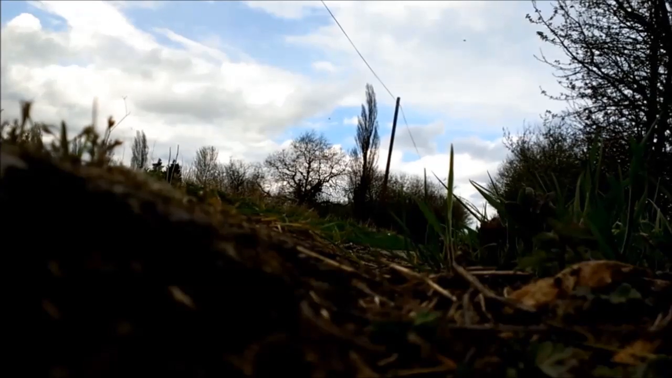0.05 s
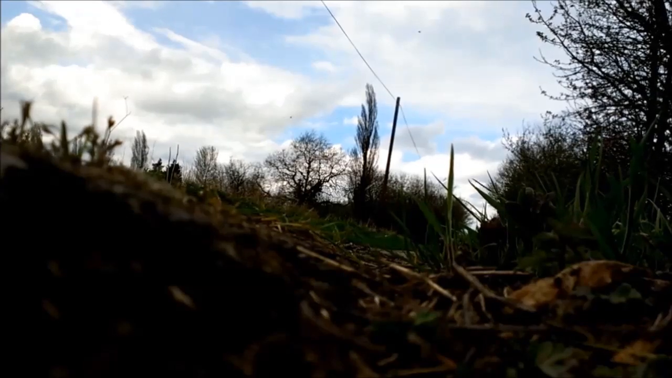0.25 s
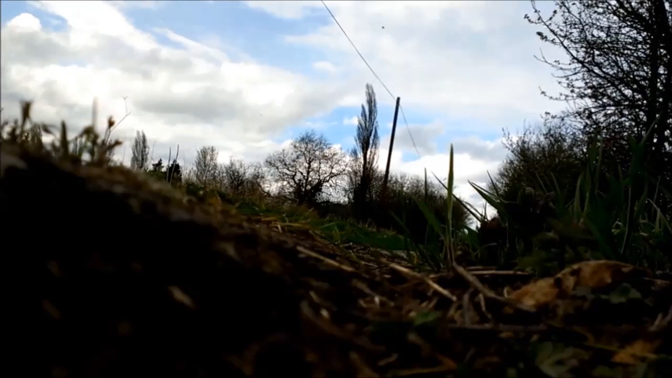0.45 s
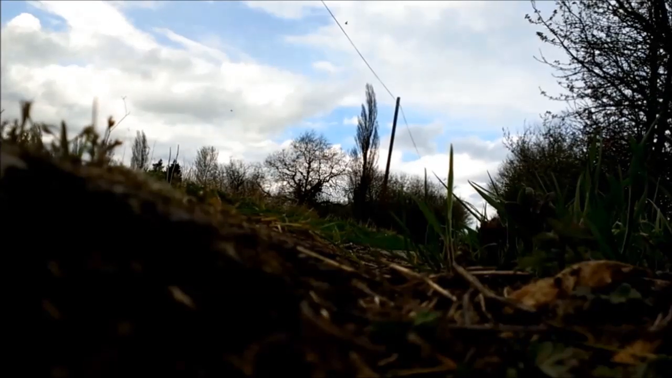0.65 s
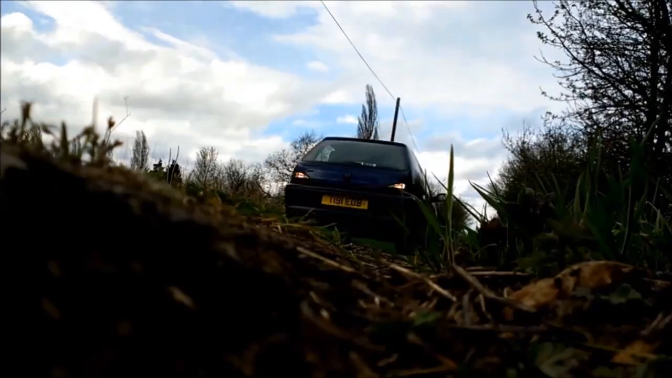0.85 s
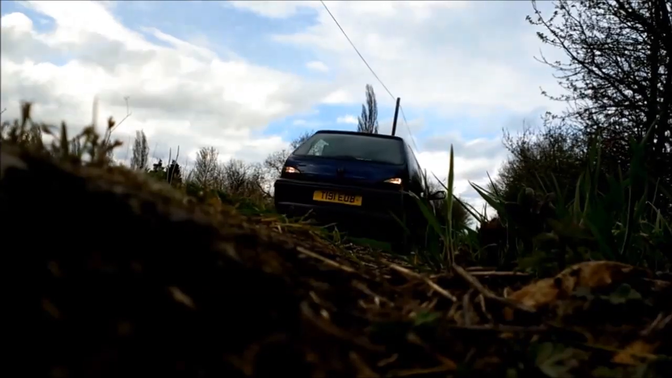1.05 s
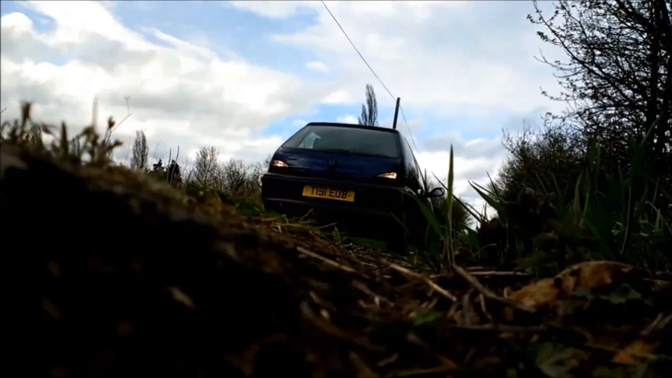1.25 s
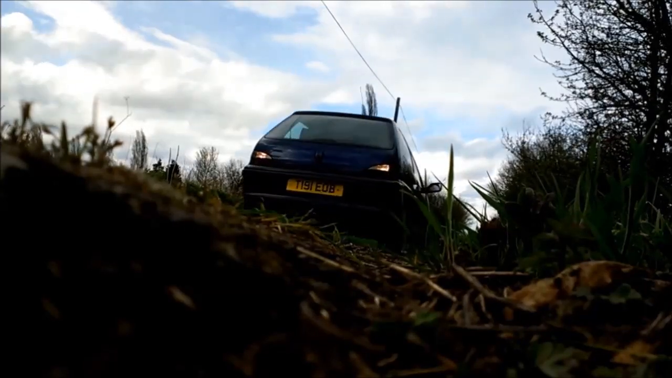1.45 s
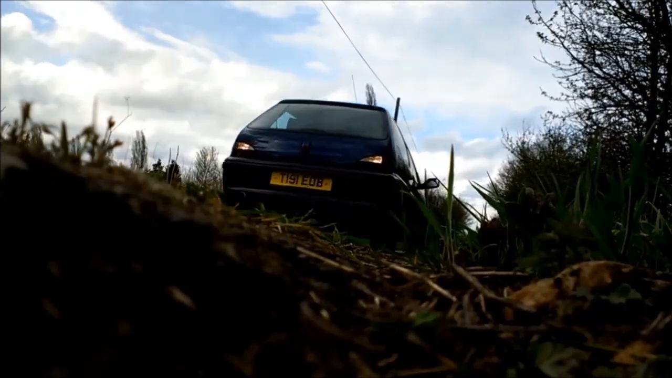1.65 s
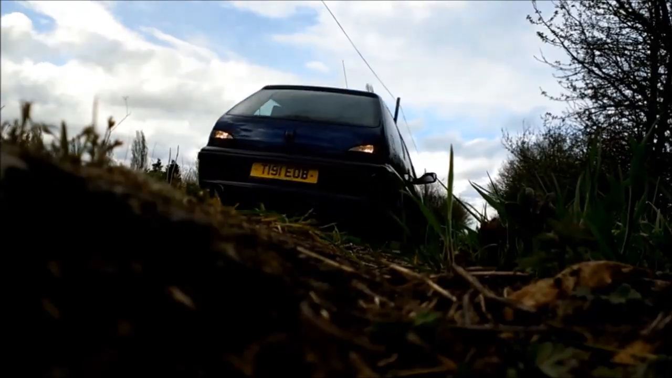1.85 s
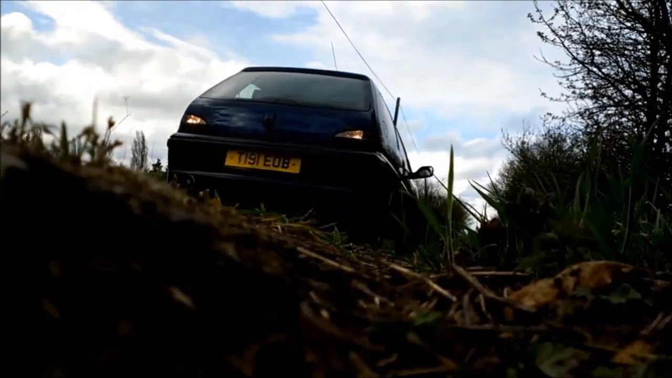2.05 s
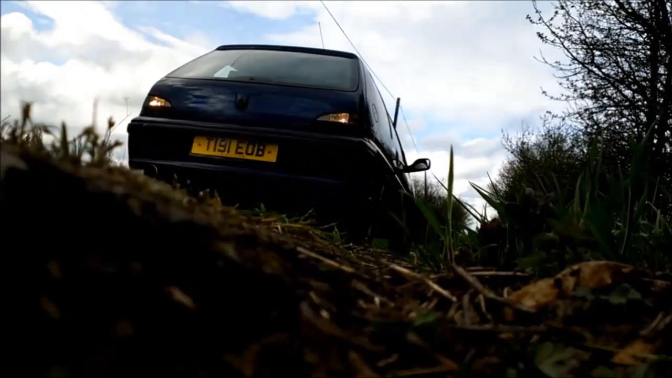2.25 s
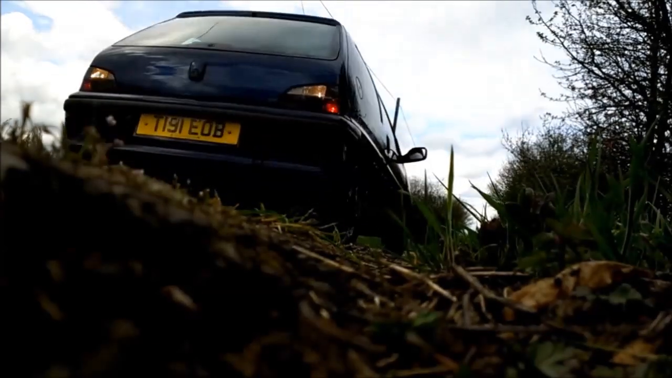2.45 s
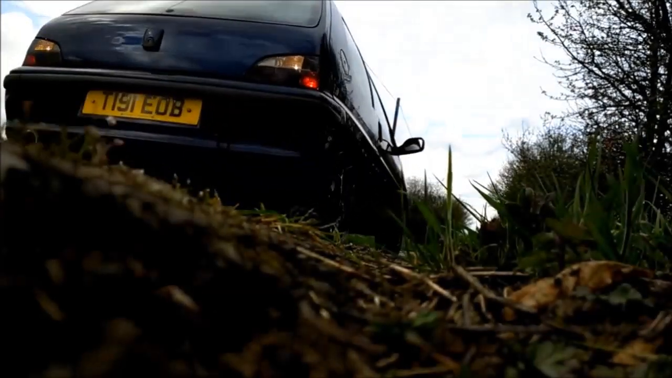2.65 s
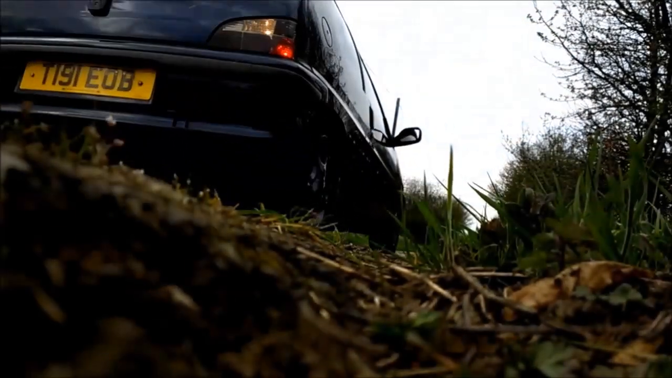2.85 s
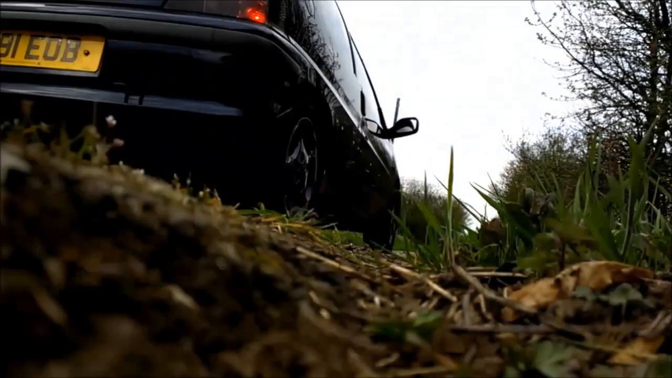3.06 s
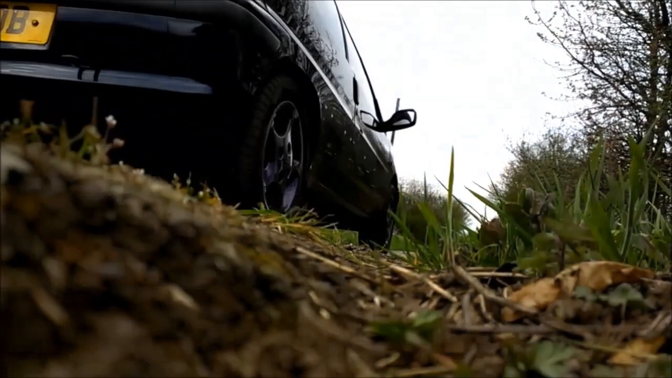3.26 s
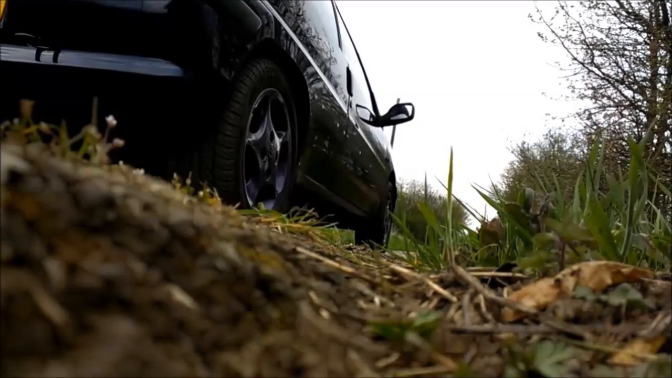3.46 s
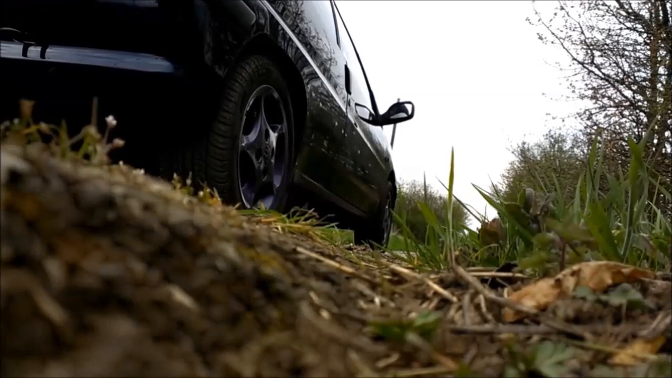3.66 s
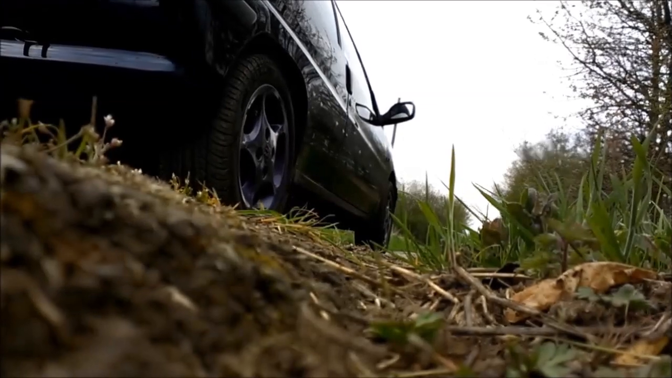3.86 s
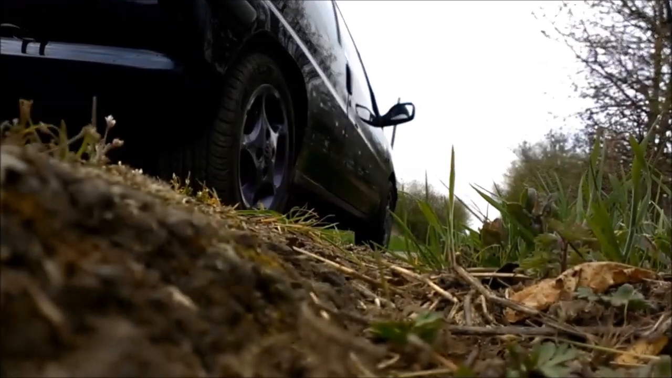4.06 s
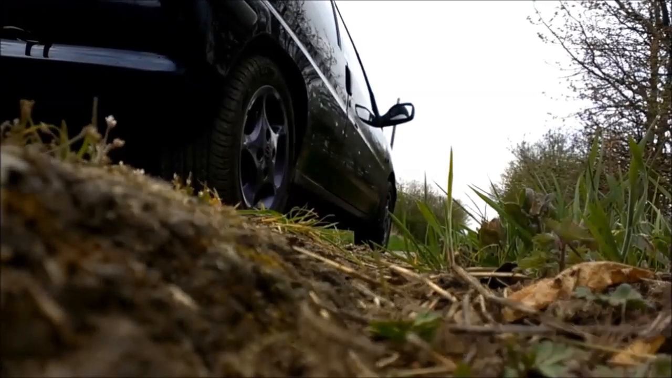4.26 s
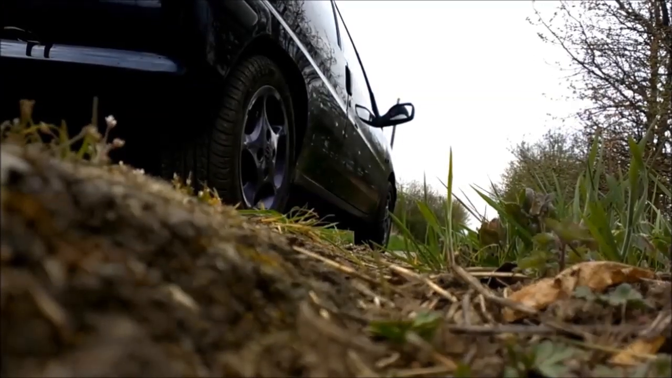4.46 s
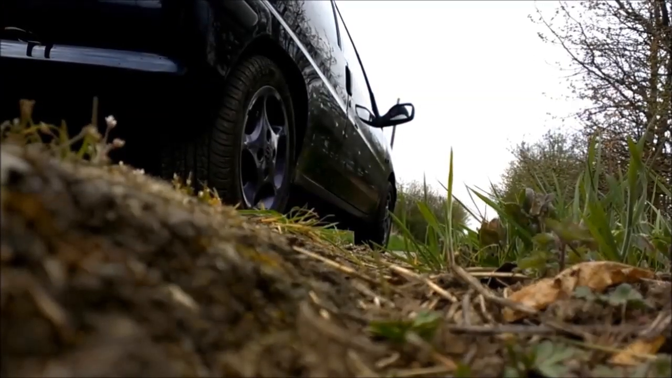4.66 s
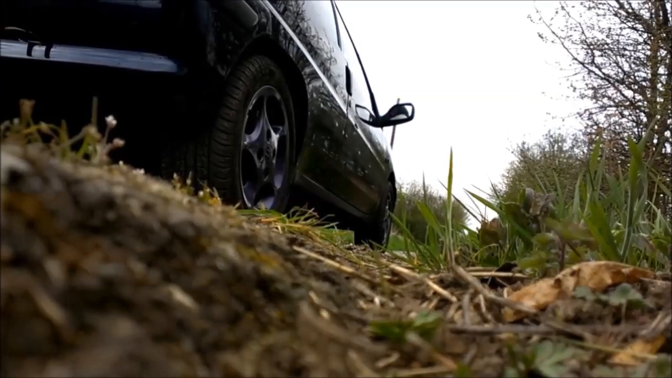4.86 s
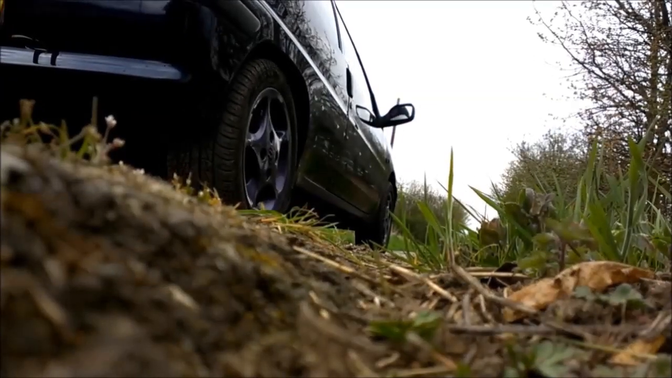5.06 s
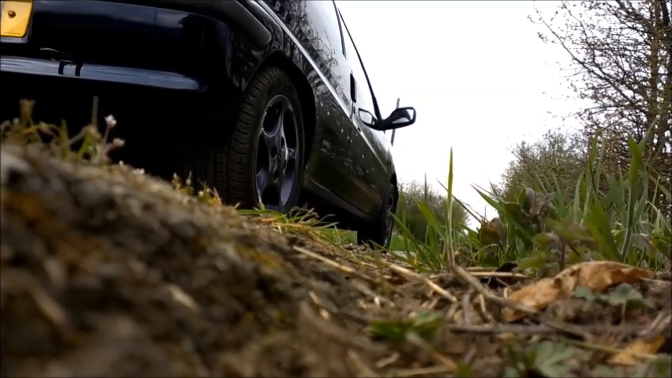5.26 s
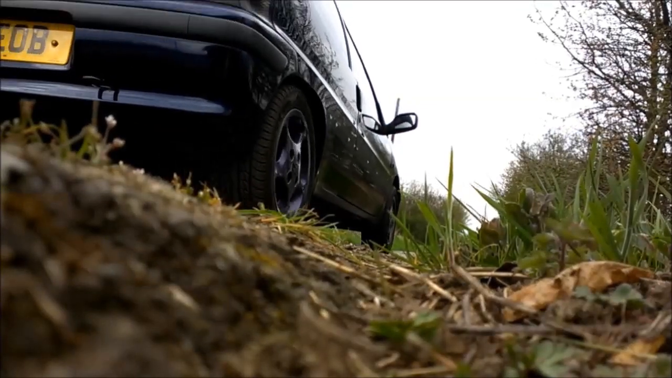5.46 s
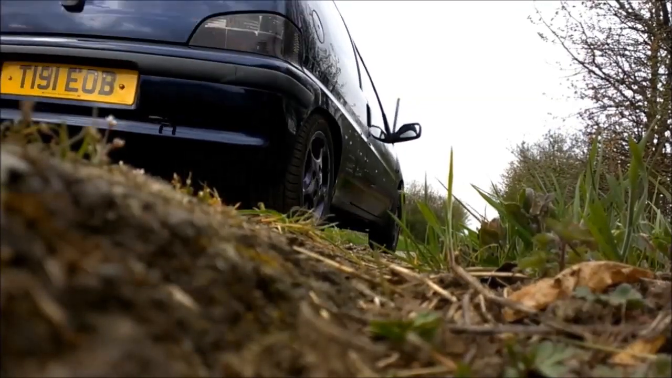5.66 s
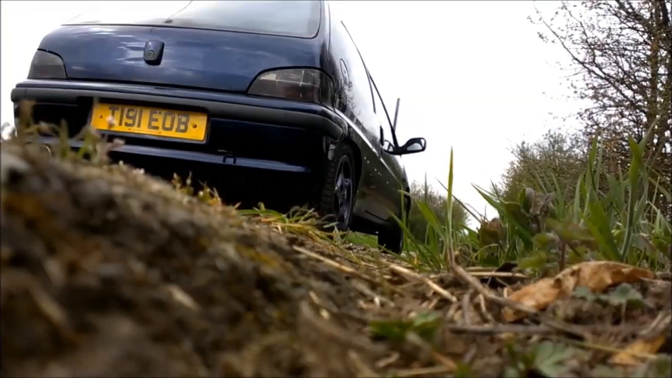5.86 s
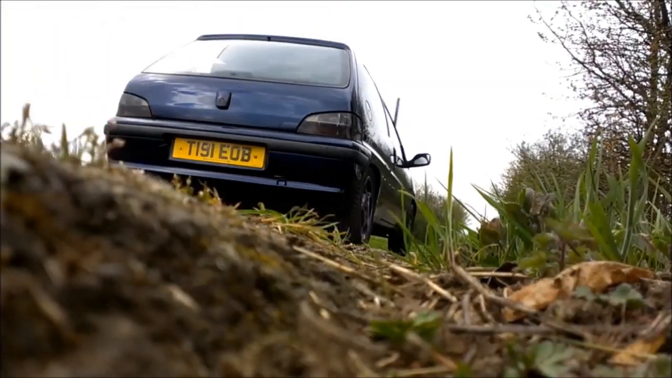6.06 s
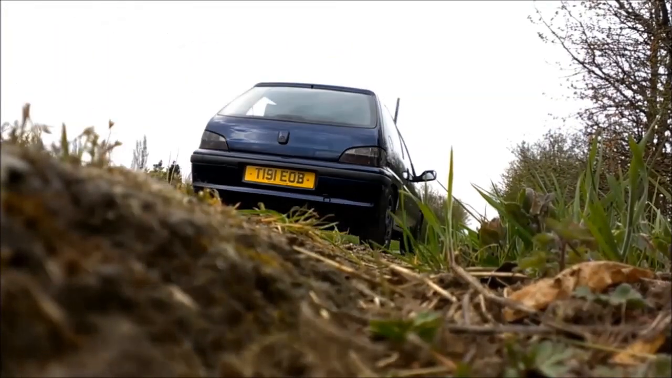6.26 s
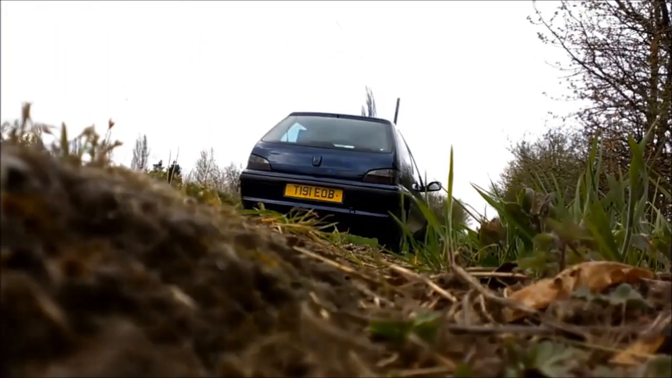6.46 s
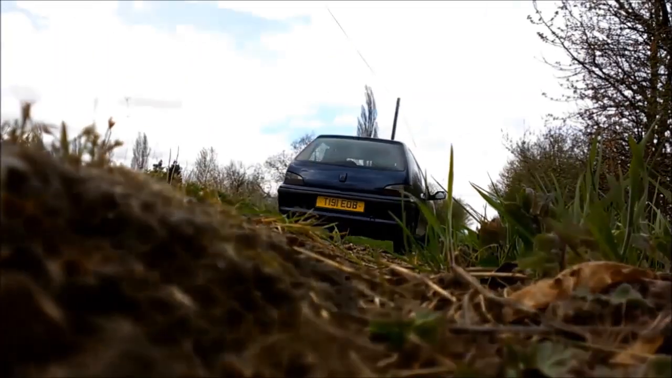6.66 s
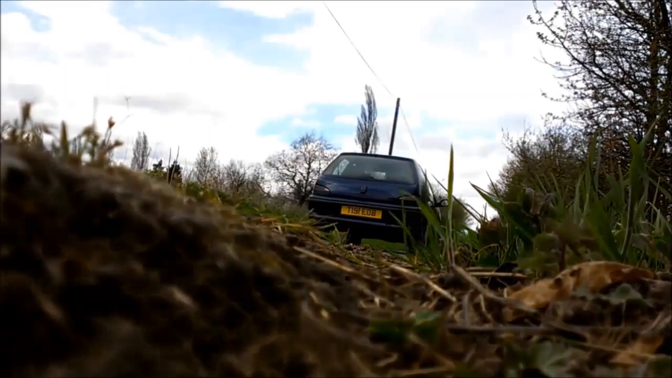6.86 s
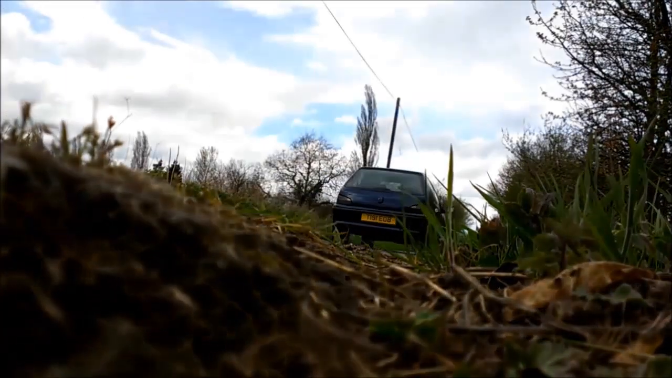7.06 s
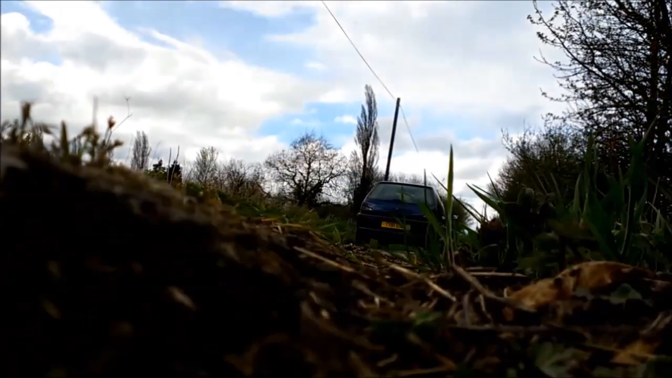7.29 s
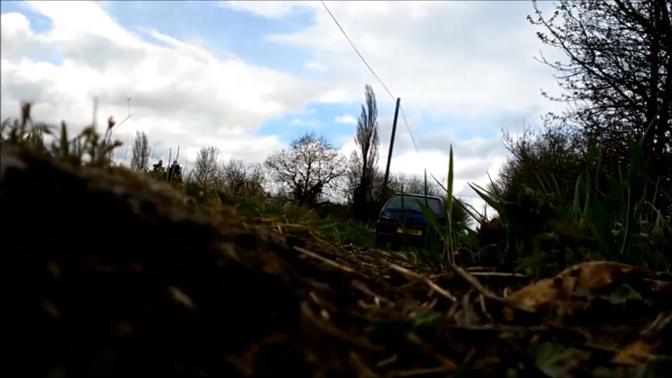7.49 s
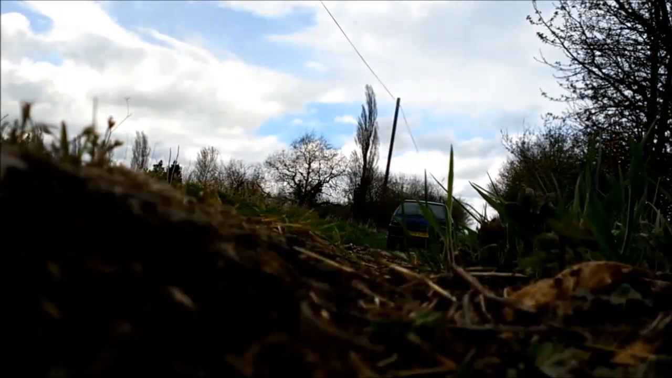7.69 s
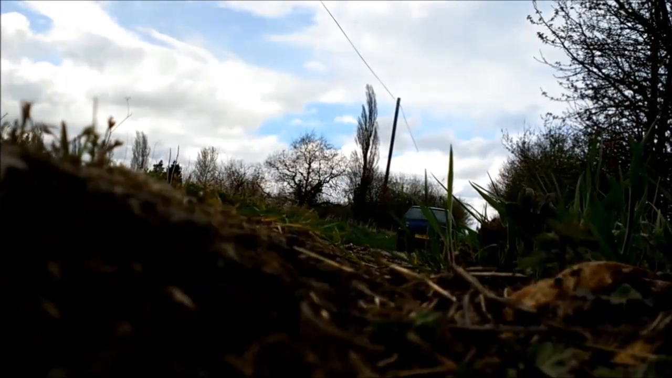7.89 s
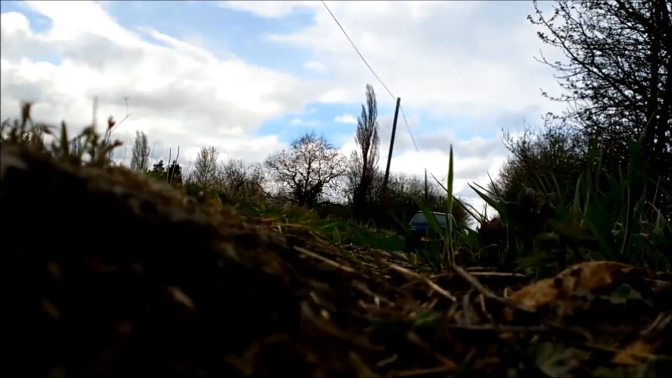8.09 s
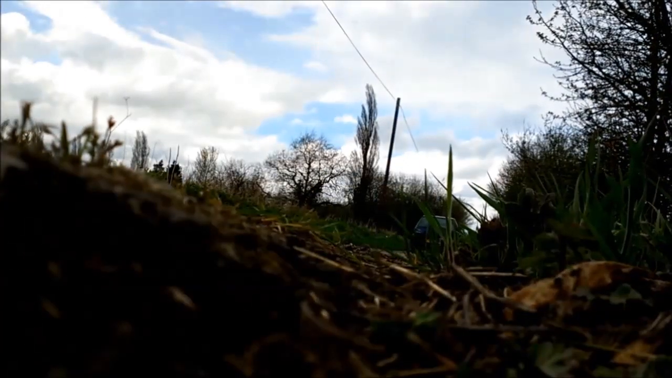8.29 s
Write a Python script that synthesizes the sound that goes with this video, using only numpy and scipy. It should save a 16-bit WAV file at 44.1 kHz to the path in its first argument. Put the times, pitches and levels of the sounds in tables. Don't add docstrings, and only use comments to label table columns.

```python
import sys
import numpy as np
from scipy import signal
from scipy.io import wavfile
from scipy.ndimage import uniform_filter1d

SR = 44100
rng = np.random.default_rng(int(sys.argv[2]) if len(sys.argv) > 2 else 0)


def master_out(mix):
    frames = np.transpose(np.atleast_2d(mix))
    ceiling = np.clip(frames, -1, 1)
    pcm = np.round(ceiling * 32767).astype(np.int16)
    wavfile.write(sys.argv[1], SR, pcm)


def field_ratio(decibels):
    return 10 ** (np.asarray(decibels, dtype=float) / 20)


N = 367353

# [f/Hz, density/dB]
FLOOR_COLOUR = [(24, -34), (40, 4), (234, 3), (277, 1), (306, -3.5), (337, -2), (1120, -14.5),
                (1470, -16.5), (2070, -23.5), (4880, -20.5), (7970, -32), (14000, -37)]
FLOOR_DB = -64
# [t/s, level/dB]
FAR_VEHICLE = [
    (0, -71),
    (.04, -62.5),
    (.075, -72),
    (.1, -93),
]
# [t/s, peak level/dB, half length/s]
GUSTS = [(.02, -64.5, 0.19), (0.694, -63.5, 0.22), (1.174, -57, 0.37), (1.575, -52, 0.23),
         (1.837, -49.5, 0.21), (2.015, -47, 0.17), (2.32, -55, 0.17), (2.78, -47, 0.18), (3.024, -51, 0.3),
         (3.155, -46.5, 0.14), (3.345, -46, 0.042), (3.596, -50, 0.52), (3.75, -41.5, 0.083),
         (4.042, -51, 0.16), (4.208, -50, 0.1), (4.48, -47, 0.22), (4.82, -73.5, 0.17),
         (5.055, -46.5, 0.28), (5.503, -64, .17), (5.817, -59, 0.081), (6.07, -49.5, 0.073),
         (6.32, -49, 0.11), (6.57, -41, 0.073), (6.802, -60, .07), (7.02, -51, 0.13), (7.63, -53.5, .12),
         (7.833, -49, 0.23)]
GUST_FALL_DB, LULL_DB = 12.5, -80
# [f/Hz, level/dB]
WIND_COLOUR = [(15, -7), (30, -4.5), (60, -0.5), (100, -4), (160, -8), (300, -23.5), (600, -55.5)]
# [t/s, peak level/dB, f/Hz]
THUMPS = [(1.801, -32.5, 584), (1.874, -27.5, 245), (1.913, -33, 119), (2.03, -29, 169), (2.09, -33.5, 108),
          (2.831, -41, 198), (3.052, -31, 101), (3.15, -27, 70), (3.347, -26.5, 66), (3.538, -33, 162),
          (3.607, -29.5, 113), (3.68, -32, 100), (3.741, -29.5, 190), (6.571, -29.5, 80)]
# [t/s, peak level/dB, decay/s]
CRACKS = [
    (0.8945, -71, 0.041),
    (3.1966, -69, 0.06),
    (3.39, -59.5, 0.13),
    (4.9077, -63, 0.074),
    (6.6917, -70, 0.055),
]

# [t/s, firing rate f/Hz]
FIRING = [(.89, 33), (1.17, 29.2), (1.42, 33.5), (1.7, 34.5), (1.9, 37.3), (2.17, 37.6), (2.6, 27.4),
          (4.45, 27.9), (4.92, 52), (5.13, 51), (5.36, 76), (5.45, 80.4), (5.55, 81.8), (5.8, 74.2),
          (6.08, 59.5), (7.52, 126.7), (7.9, 103.3), (8.33, 89)]
# [t/s, effort level/dB]
EFFORT = [(.89, -40), (2.1, -37), (2.5, -43), (2.9, -36.5), (4.45, -41.5), (4.6, -33), (5.05, -33.5),
          (5.42, 0), (5.7, -1), (6.06, -21), (6.48, -1.5), (7.15, -7.5), (7.43, -2.5), (7.53, -5),
          (7.59, -19), (7.97, -24), (8.22, -7.5), (8.33, -8)]
# [t/s, distance/m]
DISTANCE = [(.89, 6.7), (1.5, 4.6), (2.1, 3.73), (2.9, 3.38), (4.4, 2.6), (5.4, 2.95), (6.05, 3.5),
            (6.5, 4.67), (7.5, 6.96), (8.33, 12.5)]
NEAR_M, IDLE_HZ = 3, 28
# [level/dB, share of effort/1, slope/(dB per octave of speed), share of distance loss/1]
LAYERS = [
    (-17.5, 0.63, 0.6, 1.68),
    (-23, 1.045, -0.1, 0.77),
    (-58, 0.17, 3.1, 1.74),
    (-72, 0.19, 8.5, 2.08),
    (-101.5, .3, 9, 1.5),
    (-52, 1.05, 3, 2.7),
]
LAYER_NAMES = ["boom", "bark", "knock", "jet", "spit", "whistle"]
# [t/s, half length/s, lift level/dB]
SURGES = [
    (5.956, 0.33, 5),
    (6.066, 0.029, 7.5),
    (6.727, 0.062, 3),
]
CYLINDERS_DB = [0, -.7, -.3, -.6]

# [multiple of firing rate/1, level/dB]
GEAR = [(18.2, 2), (24, -1), (27.6, -6), (31.5, -6), (37, -3)]
# [f/Hz, level/dB]
CASING = [(450, -14), (640, -1), (720, -9), (810, 0), (910, 0), (1020, -6), (1100, -3), (1300, -12),
          (1600, -30)]
REVERSE_END_S, WHINE_RISE_S = 2.095, 0.14
WHINE_DB, WHINE_FALL_DB_PER_S = -63.5, 250
TYRES_DB, TYRES_FALL_DB_PER_S = -58, 56

# [f/Hz, density/dB]
JET = [(1650, -22.5), (2800, -4), (3700, -1.5), (4550, -8), (5200, -2.5), (6300, -7.5), (7000, -13),
       (8700, -18.5), (11000, -23), (14000, -40.5)]
# [f/Hz, level/dB]
SPIT = [(5000, -41.5), (7000, -1.5), (9000, -1), (11000, 5), (13000, 0.5), (15500, -16)]
# [t/s, peak level/dB]
POPS = [(5.4184, -66), (5.5048, -61), (5.7615, -60.5), (5.8267, -65), (5.8711, -60), (5.9103, -52),
        (5.942, -60), (6.1988, -64), (6.289, -67), (6.6917, -72)]
POP_S = 0.0048
WHISTLE_HZ, WHISTLE_WIDTH_HZ = 5600, 900
WHISTLE_FULL_DB = -18.5

# [f/Hz, width/Hz, level/dB]
BLOCK = [(945, 660, -0.5), (1800, 640, -4), (2660, 390, -6.5), (3260, 1300, -14)]
KNOCK_LOW_HZ, KNOCK_HIGH_HZ = 1790, 2100
KNOCK_SPREAD_HZ, KNOCK_WIDTH_HZ = 90, 360
ROLLING_RING, BLUR_HZ = .4, 52

# [f/Hz, level/dB]
BOOM = [(24, -47), (45, -5), (64, 1), (107, 0), (150, 4.5), (190, -3.5), (240, -8.5), (310, -10),
        (400, -20.5), (570, -56.5)]
# [f/Hz, level/dB]
IDLE_BOOM = [(25, -39), (55, -19.5), (82, -12.5), (110, -2.5), (138, 4), (165, -14.5), (210, -14),
             (280, -23), (500, -60.5)]
# [f/Hz, level/dB]
COAST = [(20, -2), (130, -4.5), (200, 0), (400, -37), (20000, -72)]
# [firing rate f/Hz, level/dB]
PIPE_TUNING = [(26, -7.5), (37, -1), (46, 3), (53, -4.5), (78, 2.3), (92, -0.5), (110, -1.5), (130, -2.5)]
BOOM_FULL_DB = -12
REVERSE_BOOM_DB = 7
# [f/Hz, width/Hz, level/dB]
BARK = [(343, 54, -11), (502.5, 86, 13.5), (583, 103, 14), (800, 990, -24)]
# [effort level/dB, share/1]
RASP = [(-35, .92), (-22, .82), (-11, .5), (-6, .28), (-2, .13)]
BARK_LAG_S, STEEP_S, SOFT_S = .0025, .00029, .00044
TUFT_IDLE_HZ, TUFT_OPEN_HZ = 465, 528


def seconds():
    return np.arange(N) / SR


def evened(x):
    return x / np.sqrt(np.mean(x ** 2) + 1e-20)


def read(points, hz):
    f, value = np.transpose(points)
    return np.interp(np.log(hz + 1), np.log(f + 1), value, -90, -90)


def along(rows, off=-120):
    rows = np.asarray(rows)
    return np.interp(seconds(), rows[:, 0], rows[:, 1], off)


def coloured(x, points):
    log_gain = np.log(field_ratio(read(points, abs(np.fft.fftfreq(32768, 1 / SR)))))
    taps = np.fft.ifft(np.exp(np.conj(signal.hilbert(log_gain)))).real[:8192]
    return signal.oaconvolve(x, taps)[:N]


def steady(x, span_s=.07):
    size = int(span_s * SR)
    power = uniform_filter1d(uniform_filter1d(x ** 2, size), size)
    return x / np.sqrt(abs(power) + 1e-3 * np.mean(power))


def resonate(x, hz, width):
    turn = np.exp(2j * np.pi * np.cumsum(hz * np.ones(len(x))) / SR)
    r = np.exp(-np.pi * width / SR)
    smooth = signal.lfilter([(1 - r) ** 2], [1, -2 * r, r * r], x / turn + 1e-18)
    return 2 * (turn * smooth).real


def lumpiness(size):
    return evened(uniform_filter1d(uniform_filter1d(rng.standard_normal(N), size), size))


def background():
    quiet = field_ratio(FLOOR_DB) * evened(coloured(rng.standard_normal(N), FLOOR_COLOUR))
    return quiet + field_ratio(along(FAR_VEHICLE)) * evened(resonate(rng.standard_normal(N), 600, 740))


def gusts():
    t = np.arange(0, N / SR + .01, .005)
    s, db, half_s = np.transpose(GUSTS)[:, :, None]
    power = (field_ratio(db - GUST_FALL_DB * abs(t - s) / half_s) ** 2).sum(0) + field_ratio(LULL_DB) ** 2
    return np.interp(seconds(), t, np.sqrt(power))


def wind(lumpy_db=1.5):
    lumps = lumpiness(1500)
    rumble = steady(coloured(rng.standard_normal(N), WIND_COLOUR), 0.35)
    out = gusts() * field_ratio(6.0 + lumpy_db * lumps) * rumble
    for s, db, hz in THUMPS:
        cycles = np.arange(-1.5, 3, hz / SR)
        thump = field_ratio(db) * np.cos(2 * np.pi * cycles + 1.8) * np.exp(-(cycles / 0.39) ** 2)
        part = out[max(round(s * SR - 1.5 * SR / hz), 0):][:len(cycles)]
        part -= thump[:len(part)]
    return out


def cracks():
    out, t = np.zeros(N), np.arange(6000) / SR
    for s, db, t60 in CRACKS:
        envelope = field_ratio(db + 4 - 60 * t / max(t60, .005)) * np.minimum(t / 0.00051, 1)
        out[round(s * SR):][:len(t)] += rng.standard_normal(len(t)) * envelope
    return coloured(out, [(500, 6), (1200, 11.0), (4000, 6.5), (7000, -8.0), (13000, -33)])


def lane(x):
    taps = np.zeros(SR // 4)
    at = np.arange(300, len(taps) - 20, 20) + rng.integers(0, 20, (len(taps) - 301) // 20)
    taps[at] = rng.choice([-1., 1.], len(at)) * field_ratio(-60 * at / SR / 0.22)
    return signal.oaconvolve(x, taps / np.linalg.norm(taps))[:N]


def distance_db():
    return -20 * np.log10(along(DISTANCE, off=1e3) / NEAR_M)


def engine_db(layer):
    db, effort, per_octave, far = LAYERS[LAYER_NAMES.index(layer)]
    hz, effort_db = along(FIRING, off=1), along(EFFORT)
    if layer == "boom":
        db = db + read(PIPE_TUNING, np.clip(hz, 26, 125))
        db = db + REVERSE_BOOM_DB * np.clip((REVERSE_END_S - seconds()) / 0.43, 0, 1)
        effort_db = np.minimum(effort_db, BOOM_FULL_DB)
    if layer == "whistle":
        effort_db = np.minimum(effort_db, WHISTLE_FULL_DB)
    if layer in ("jet", "spit"):
        for s, half_s, lift_db in SURGES:
            db = db + lift_db * np.exp(-((seconds() - s) / half_s) ** 2)
    return db + effort * effort_db + per_octave * np.log2(hz / IDLE_HZ) + far * distance_db()


def firings(scatter_db=0.5):
    turns = np.cumsum(along(FIRING, off=0)) / SR
    count = turns.astype(int)
    chance = rng.standard_normal((count[-1] + 1, 3))
    strength_db = np.resize(CYLINDERS_DB, count[-1] + 1) + scatter_db * chance[:, 0]
    clicks = np.diff(count, prepend=0) * field_ratio(strength_db[count])
    return turns, clicks, chance[count, 1:].T


def reversing():
    hz = along(FIRING, off=49)
    whine = 0
    for multiple, db in GEAR:
        waver = evened(resonate(rng.standard_normal(N), 8.2, 13))
        level_db = db + read(CASING, multiple * hz) + 2.5 * waver
        phase = 2 * np.pi * multiple * np.cumsum(hz) / SR + 0.71 * waver
        whine = whine + field_ratio(level_db) * np.sin(phase)
    grit = rng.standard_normal(N)
    tyres = evened(resonate(grit, 760, 450) + field_ratio(-7.5) * resonate(grit, 1930, 980))
    since_s, far_db = np.maximum(seconds() - REVERSE_END_S, 0), distance_db()
    whine_db = WHINE_DB + 0.38 * far_db - WHINE_FALL_DB_PER_S * since_s
    tyres_db = TYRES_DB + 1.9 * far_db - TYRES_FALL_DB_PER_S * since_s
    rise = np.clip((seconds() - FIRING[0][0]) / WHINE_RISE_S, 0, 1)
    return field_ratio(whine_db) * rise * whine + field_ratio(tyres_db) * tyres


def jet(turns, chance):
    t = seconds()
    gate = .8 + 1.4 * field_ratio(2.2 * chance[1]) * np.exp(-(turns % 1) / .28)
    hiss = steady(coloured(gate * rng.standard_normal(N), JET), 0.15)
    spit_gate = .08 + field_ratio(4.5 * chance[0]) * np.exp(-(turns % 1) / .15)
    spit = steady(coloured(spit_gate * rng.standard_normal(N), SPIT), .2)
    pops = sum(field_ratio(db - 7.5) * np.exp(-abs(t - s - POP_S) / POP_S) for s, db in POPS)
    puffs = (gate - .7) ** 2 * rng.standard_normal(N)
    lip = steady(resonate(puffs, WHISTLE_HZ, WHISTLE_WIDTH_HZ), 0.16)
    out = field_ratio(engine_db("jet")) * hiss + field_ratio(engine_db("whistle")) * lip
    return out + (field_ratio(engine_db("spit")) + pops) * spit


def knock(turns, chance):
    since_s = (turns % 1) / np.maximum(along(FIRING, off=1), 1)
    burst = np.minimum(since_s / .005, 1) * np.exp(-(since_s / .013) ** 2)
    burst = burst + .45 * np.exp(-abs(since_s - .02) / .003)
    drive = burst * field_ratio(2.2 * chance[0]) * rng.standard_normal(N)
    revving = (along(FIRING) - BLUR_HZ) / 25
    away = np.clip(revving, 0, 1)
    shift_hz = KNOCK_SPREAD_HZ * chance[1]
    low = resonate(drive * field_ratio(-4 - 2 * chance[1]), KNOCK_LOW_HZ + shift_hz, KNOCK_WIDTH_HZ)
    high = resonate(drive * field_ratio(2 * chance[1] - 9 * away), KNOCK_HIGH_HZ + shift_hz, KNOCK_WIDTH_HZ)
    ring = steady(low + high, .2)
    shake = (1.4 + burst) * rng.standard_normal(N)
    rattle = evened(sum(field_ratio(db) * resonate(shake, hz, width) for hz, width, db in BLOCK))
    blur = np.clip(revving, seconds() < REVERSE_END_S, 1)
    return field_ratio(engine_db("knock")) * steady((1 - (1 - ROLLING_RING) * blur) * ring + .75 * rattle, .2)


def tailpipe(clicks, front_s):
    t = np.arange(2000) / SR
    ring = 0
    for hz, width, db in BARK:
        ring = ring - field_ratio(db) * np.cos(2 * np.pi * hz * t) * np.exp(-np.pi * width * t)
    soft = np.exp(-.5 * ((t[:400] - BARK_LAG_S) / front_s) ** 2)
    return steady(signal.oaconvolve(clicks, np.convolve(ring, soft))[:N])


def exhaust(clicks):
    hz, effort_db = along(FIRING, off=0), along(EFFORT)
    load = np.clip((hz - 45) / 9, 0, 1)
    coast = np.clip((-8 - effort_db) / 9, 0, 1) * (hz > 85)
    loaded = steady(coloured(-clicks, BOOM))
    loaded = (1 - coast) * loaded + coast * coloured(loaded, COAST)
    boom = (1 - load) * steady(coloured(-clicks, IDLE_BOOM)) + load * loaded
    turbulence = field_ratio(2.4 * load * lumpiness(500)) * rng.standard_normal(N)
    tuft = resonate(turbulence, TUFT_IDLE_HZ + (TUFT_OPEN_HZ - TUFT_IDLE_HZ) * load, 248)
    steep = np.clip((effort_db + 0.26 * distance_db() + 6.5) / 7, 0, 1)
    pulses = steep * tailpipe(clicks, STEEP_S) + (1 - steep) * tailpipe(clicks, SOFT_S)
    share = np.interp(effort_db, *np.transpose(RASP))
    bark = np.sqrt(1 - share ** 2) * pulses + share * steady(tuft, 0.37)
    return field_ratio(engine_db("boom")) * steady(boom) + field_ratio(engine_db("bark")) * bark


def scene():
    turns, clicks, chance = firings()
    car = reversing() + jet(turns, chance) + knock(turns, chance) + exhaust(clicks)
    echoes = field_ratio(-15) * lane(car)
    return (background() + wind() + cracks() + echoes + car)[None]


def band_limit(x):
    return signal.sosfilt(signal.butter(12, 14160, fs=SR, output="sos"), x)


def record(dry):
    return band_limit(dry)


dry = scene()
out = record(dry)
master_out(out)
```